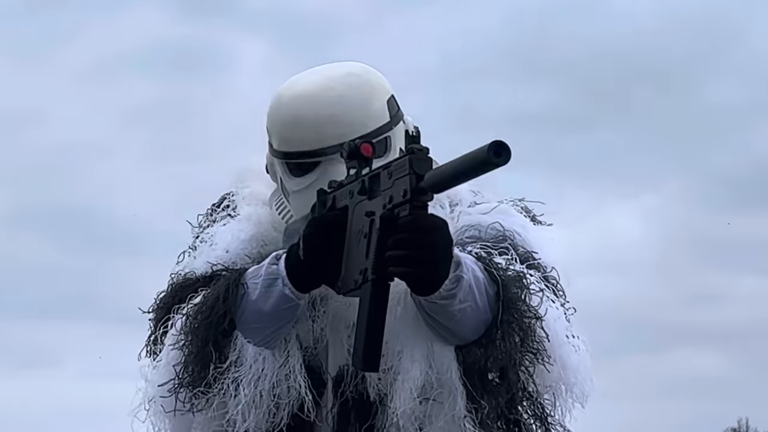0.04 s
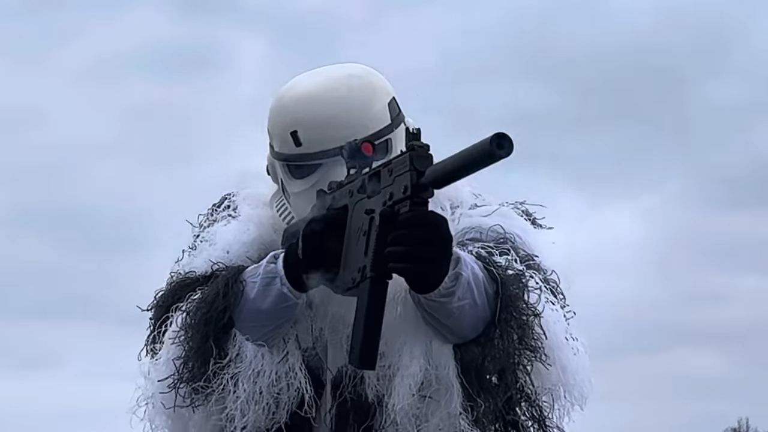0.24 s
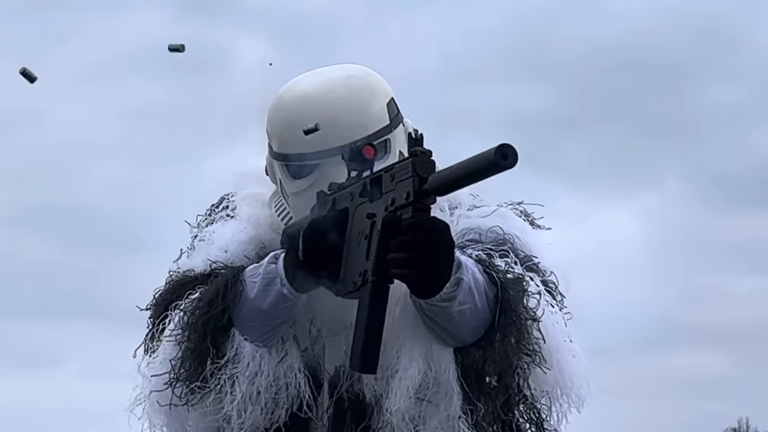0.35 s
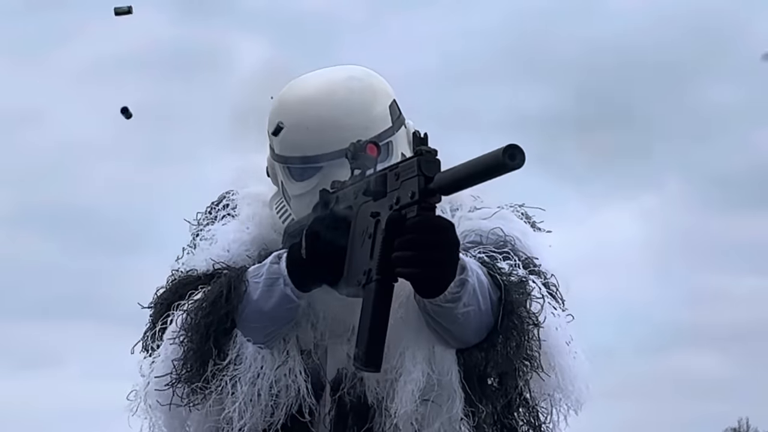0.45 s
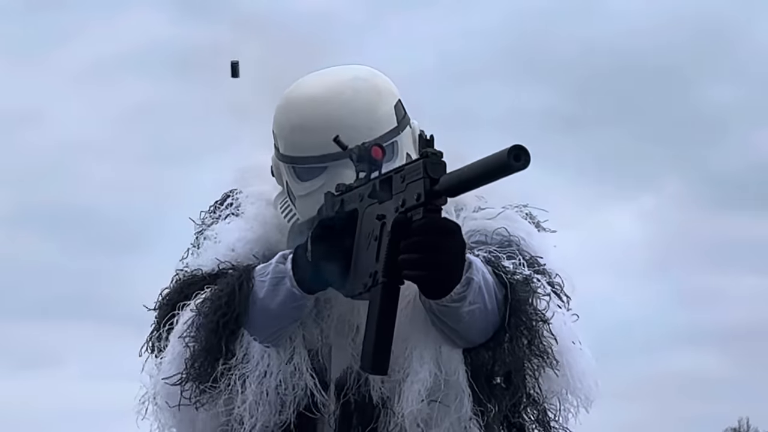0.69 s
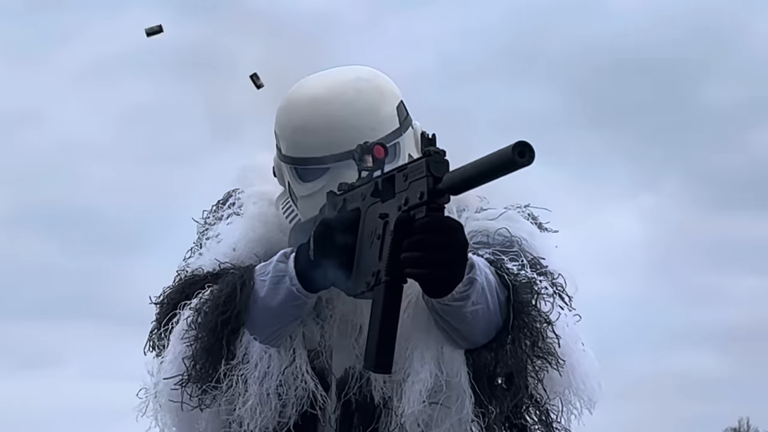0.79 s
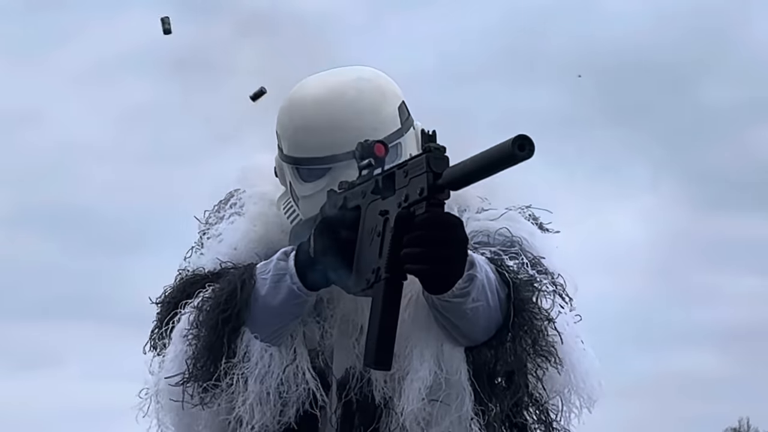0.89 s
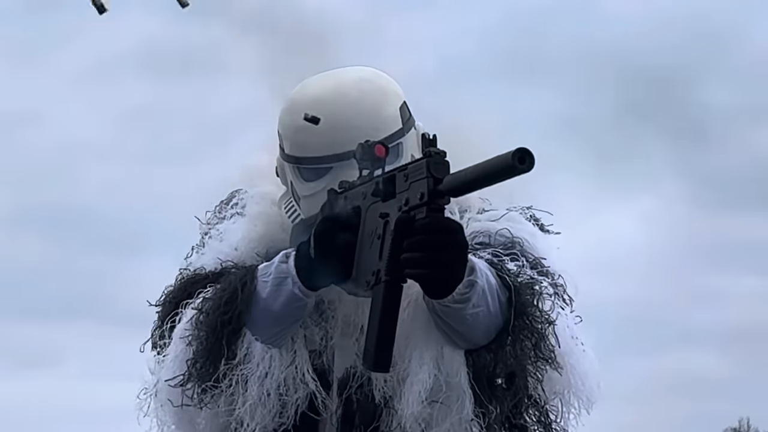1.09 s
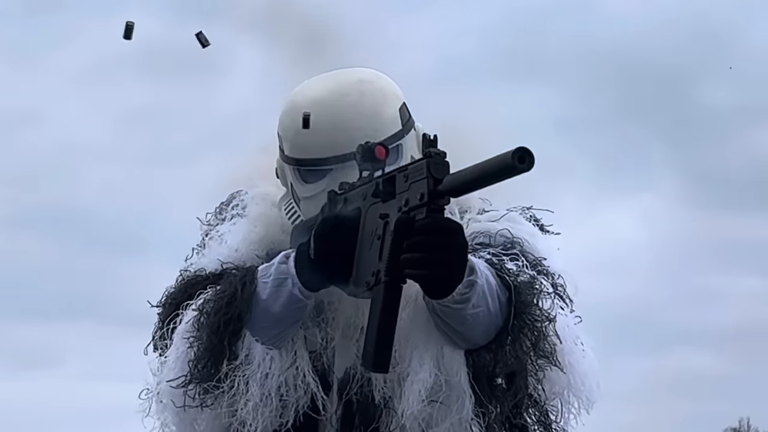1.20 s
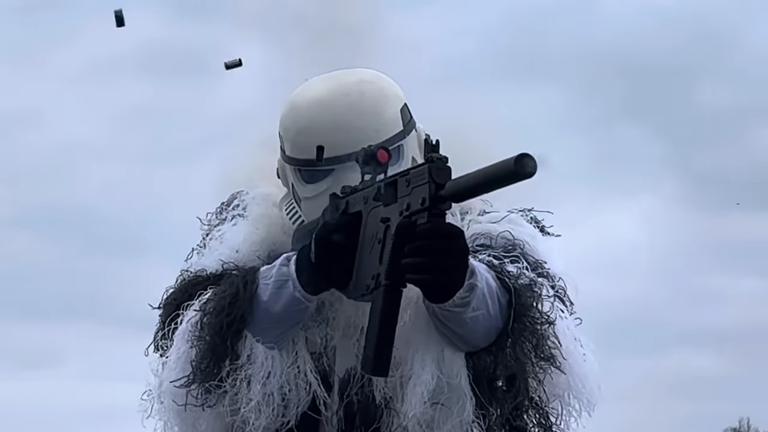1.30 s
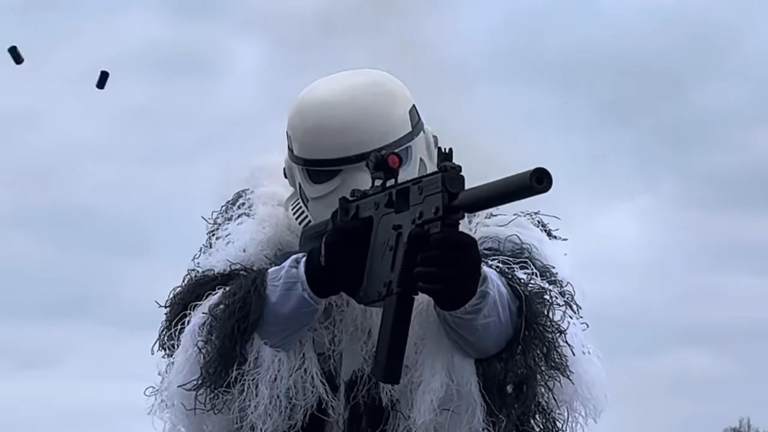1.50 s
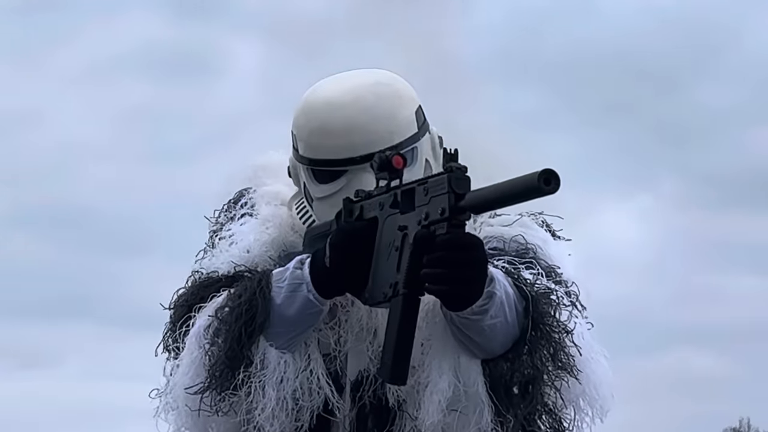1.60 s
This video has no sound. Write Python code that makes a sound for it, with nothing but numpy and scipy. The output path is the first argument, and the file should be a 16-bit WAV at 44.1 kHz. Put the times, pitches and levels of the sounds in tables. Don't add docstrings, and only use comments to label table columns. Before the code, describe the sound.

A silenced automatic gun rips off one very fast burst outdoors, then stops dead

```python
import sys
import numpy as np
from scipy import signal
from scipy.fft import rfft, irfft
from scipy.io import wavfile

SR = 44100
rng = np.random.default_rng(int(sys.argv[2]) if len(sys.argv) > 2 else 0)


def to_wav(sig):
    pcm = np.clip(np.atleast_2d(sig), -1, 1) * 32767
    pcm = np.round(pcm).astype(np.int16)
    wavfile.write(sys.argv[1], SR, pcm.T)


def convert_level_to_amplitude(level_db):
    exponent = np.asarray(level_db, float) / 20
    return 10 ** exponent


N = 72765
T = np.arange(N) / SR
HZ = np.arange(N // 2 + 1) * SR / N

# [t/s, level/dB]
WIND_LEVEL = [(0.0, -30), (0.28, -36), (0.412, -26), (0.472, -27), (0.648, -40), (0.758, -54),
              (1.212, -40.5), (1.484, -66.5), (1.65, -72.5)]
# [f/Hz, level/dB per Hz]
WIND_TONE = [(15, -32.5), (25, 8), (55, -3), (119, -15.5), (186, -23), (220, -21.5), (306, -38), (900, -54),
             (1170, -83), (1980, -120)]
# [f/Hz, level/dB per Hz]
DISTANT_TONE = [(18, -51.5), (30, -11), (81, 4.5), (213, -12.5), (286, -15.5), (318, -15.5), (1200, -30.5),
                (1560, -58), (2640, -120)]
# [t/s, level/dB]
WASH_LEVEL = [(0, -53.5), (.2, -67.5), (1.35, -78), (1.5, -66.5), (1.65, -75.5)]
# [f/Hz, level/dB per Hz]
WASH_TONE = [(410, -52.5), (700, -22), (761, -10.5), (1240, -9), (1630, -4), (4470, -5), (12000, -25.5),
             (15600, -47.5), (22000, -120)]
# [f/Hz, level/dB]
SEAR_TONES = [(700, -52), (3600, -50), (5500, -39)]
# [delay t/s, level/dB, attack t/s, decay t/s, scatter t/s]
ACTION_PARTS = [
    (-.0052, -19.5, .0008, 0.0037, 0.00034),
    (0.013, -21.5, .003, 0.0043, 0.00069),
    (0.029, -27, 0.006, 0.0082, .002),
]
# [t/s, level/dB, decay t/s]
LOOSE_CLICKS = [(.013, -49, 0.003), (.068, -46, 0.0024), (0.702, -40, .003), (1.3906, -45.5, 0.0017),
                (1.4099, -44.5, .005), (1.5073, -63, 0.0069), (1.5528, -55.5, 0.00292),
                (1.648, -60.5, 0.0027)]
# [f/Hz, level/dB, time to fall 60 dB t/s]
STEEL_RINGS = [(2300, -4, .008), (3500, -2, .01), (4400, -2, .008), (5400, 0, .01), (6800, -5, .007)]
# [t/s, jet peak level/dB, pop level/dB, pop f/Hz, thump level/dB]
SHOTS = [(0.2287, -7.5, -23, 328, -27.5), (0.2762, -5, -9, 336, -18), (0.3258, -1.5, -15, 223, -22.5),
         (0.3759, -4, -18, 439, -20.5), (0.422, -2.5, -24.5, 417, -22.5), (0.4671, -2.5, -15.5, 221, -23.5),
         (0.519, -3, -16, 549, -26), (0.5684, -2.5, -29, 326, -30.5), (0.6145, -1, -24.5, 331, -36.5),
         (0.6685, -3, -34, 522, -33), (0.7357, -4.5, -39, 231, -43), (0.7843, -4.5, -25.5, 471, -44.5),
         (0.836, -6, -25.5, 363, -34.5), (0.8849, -5, -23.5, 371, -34.5), (0.9343, -8, -23.5, 536, -41),
         (0.9948, -4.5, -20, 428, -28.5), (1.044, -5, -36, 275, -36.5), (1.0991, -4, -25.5, 743, -39),
         (1.1458, -4.5, -29, 253, -38.5), (1.1973, -7, -30, 484, -38), (1.2548, -4, -28, 444, -34),
         (1.3061, -5.5, -26, 530, -37), (1.3571, -6, -28, 339, -36)]
# [f/Hz, level/dB per Hz]
JET_TONE = [(410, -17.5), (700, -2), (1910, -5), (2150, -3.5), (2400, -3.5), (5940, 0.5), (7890, -8),
            (9500, -16.5), (12400, -50.5), (20900, -120)]
# [f/Hz, level/dB per Hz]
FINE_HISS_TONE = [(8500, -51.5), (9600, -25), (11200, -10.5), (13300, -26), (15500, -16.5), (16000, -61.5)]
# [f/Hz, phase/radians]
MICROPHONE_LEAD = [(0, .3), (350, .3), (1100, -.4), (3200, .7), (5400, 0), (7800, .25), (8400, 0),
                   (15700, -12.5)]

JET_DB = -7.5


def unit(x):
    return x / np.sqrt(np.mean(x ** 2))


def curve(rows, at, log=False):
    a, b = np.array(rows, float).T
    if log:
        return np.interp(np.log(at + 1), np.log(a + 1), b)
    return np.interp(at, a, b)


def tone_gain(rows):
    return convert_level_to_amplitude(curve(rows, HZ, True))


def colour(x, gain):
    return irfft(rfft(x) * gain, N)


def noise(gain):
    return unit(colour(rng.standard_normal(N), gain))


def walk(rate_hz):
    return noise(1 / (1 + (HZ / rate_hz) ** 2))


def hump(hz, width):
    return np.exp(-(np.log((HZ + 1) / hz) / width) ** 2 / 2)


def burst(start, decay, attack=0.00033, hold=0.):
    since = T - start
    rise = np.clip(since / max(attack, 1e-5), 0, 1)
    return rise * np.exp(-np.maximum(since - attack - hold, 0) / max(decay, 1e-4))


def push(start, db, hz, width, length, rough):
    turbulence = 1 + rough * rng.standard_normal(N)
    x = colour(burst(start, length) * turbulence, hump(hz, width))
    return convert_level_to_amplitude(db) * x / np.sqrt(np.sum(x ** 2) / (0.012 * SR))


def air():
    wind_db, gust_db = 0.5, 3
    wind = noise(tone_gain(WIND_TONE)) * convert_level_to_amplitude(curve(WIND_LEVEL, T) + wind_db + gust_db * walk(30.0))
    distant = noise(tone_gain(DISTANT_TONE)) * convert_level_to_amplitude(-66.5)
    wash = noise(tone_gain(WASH_TONE)) * convert_level_to_amplitude(curve(WASH_LEVEL, T) + 0.73 * walk(25.))
    return wind + distant + wash


def bank_echo():
    return push(1.4625, -48.5, 212, 0.78, 0.0011, rough=0.22)


def field_scatter(gun):
    scatter_db, fade_60_db_s = -33.5, 0.24
    sides = []
    for _ in range(2):
        fade = convert_level_to_amplitude(scatter_db - 60 * T / fade_60_db_s)
        echoes = fade * rng.standard_normal(N) * np.sqrt(1000 / SR)
        sides.append(signal.fftconvolve(gun, echoes)[:N])
    return np.mean(sides, axis=0)


def ground_mirror(x):
    delay_s, copy_db = .0021, -7.5
    return colour(x, 1 + convert_level_to_amplitude(copy_db) * np.exp(-2j * np.pi * HZ * delay_s))


def sear():
    shape = burst(0.2086, 0.0014, attack=0.0072, hold=.017)
    tones = sum(convert_level_to_amplitude(db + 2.5 * walk(60.)) * np.sin(2 * np.pi * hz * T) for hz, db in SEAR_TONES)
    return shape * tones


def action():
    scatter_db, ring_db, top_hz = 2.5, -9, 8000
    rattle_db, rattle_hz = 4, 150
    shape = sum(convert_level_to_amplitude(db) * burst(t, decay) for t, db, decay in LOOSE_CLICKS)
    for t, jet_db, *_ in SHOTS:
        for late, part_db, attack, decay, scatter_s in ACTION_PARTS:
            level_luck, time_luck = rng.standard_normal(2)
            level = convert_level_to_amplitude(jet_db + JET_DB + part_db + scatter_db * level_luck)
            shape = shape + level * burst(t + late + scatter_s * time_luck, decay, attack)
    ring = 0
    for hz, db, t60 in STEEL_RINGS:
        ring = ring + convert_level_to_amplitude(db) / (1 + 1j * (HZ - hz) * 2 * np.pi * t60 / np.log(1000))
    gain = (tone_gain(JET_TONE) + convert_level_to_amplitude(ring_db) * 2 * ring) / (1 + (HZ / top_hz) ** 4)
    gain = gain / np.sqrt(np.mean(abs(gain) ** 2))
    scrape = rng.standard_normal(N) * convert_level_to_amplitude(rattle_db * walk(rattle_hz))
    return colour(scrape * shape, gain)


def pops():
    total = 0
    for t, _, db, hz, _ in SHOTS:
        late = -.0006 + .0002 * max(db + 26, 0)
        total = total + push(t + late, db - 0.5, hz, width=0.34, length=0.0018, rough=2.5)
    return total


def thumps():
    pivot_db, db_per_octave = -27, 12
    total = 0
    for t, _, _, _, db in SHOTS:
        hz = 102 * 2 ** ((pivot_db - db) / db_per_octave)
        total = total + push(t - 0.00086, db + 6, hz, width=0.79, length=0.001, rough=5.0)
    return total


def jet(gain, release, sigh_db, sigh, late=0.):
    shape = 0
    for t, db, *_ in SHOTS:
        start = t + late
        roar = burst(start, release, attack=0.0009, hold=0.0037)
        sighing = convert_level_to_amplitude(sigh_db) * burst(start, sigh)
        crack = convert_level_to_amplitude(-8) * burst(start, 0.00035)
        shape = shape + convert_level_to_amplitude(db) * (roar + sighing + crack)
    crackling = rng.standard_normal(N) * convert_level_to_amplitude(2.5 * walk(650.0))
    return convert_level_to_amplitude(JET_DB) * unit(colour(crackling, gain)) * shape


def jets():
    body = jet(tone_gain(JET_TONE), release=0.0019, sigh_db=-28.5, sigh=0.0062)
    fine_hiss = jet(tone_gain(FINE_HISS_TONE), release=.003, sigh_db=-16.5, sigh=0.024, late=0.00047)
    return body + convert_level_to_amplitude(-17.5) * fine_hiss


def two_microphones(near):
    apart_db, apart_hz, floor_db = -10, 750, -11.5
    gain = hump(apart_hz, 0.53) + convert_level_to_amplitude(floor_db) / (1 + (HZ / 3000) ** 4)
    apart = convert_level_to_amplitude(apart_db) * colour(near * walk(370), gain)
    lead = np.exp(.5j * curve(MICROPHONE_LEAD, HZ))
    return np.array([colour(near + apart, lead), colour(near - apart, 1 / lead)])


def scene():
    gun = ground_mirror(sear() + action() + jets()) + pops() + thumps()
    return two_microphones(air() + bank_echo() + field_scatter(gun) + gun)


def top_cut(x):
    return signal.sosfilt(signal.butter(12, 17130, fs=SR, output="sos"), x)


def record(dry):
    lead_in = 8192
    turns, floor_hz, offset = 1.3, 9.6, 0.85
    low_cut_hz, top_hz, ceiling = 50, 15900, .95
    x = np.concatenate([dry[:, lead_in:0:-1], dry], 1)
    length = x.shape[1]
    hz = np.arange(length // 2 + 1) * SR / length
    lag = 2 * np.pi * turns * np.log((SR / 2 + floor_hz) / (hz + floor_hz)) + offset
    low_cut = 1 / np.sqrt(1 + (low_cut_hz / (hz + 1)) ** 6)
    x = irfft(rfft(x) * np.exp(1j * lag) * low_cut, length)[:, lead_in:]
    rounded = ceiling * np.tanh(x / ceiling)
    mix = colour(rounded, 1 / (1 + (HZ / top_hz) ** 120))
    return top_cut(mix)


dry = scene()
out = record(dry)
to_wav(out)
```